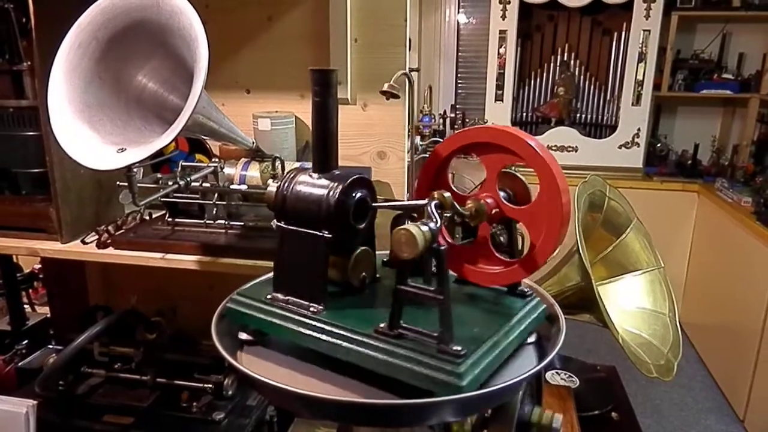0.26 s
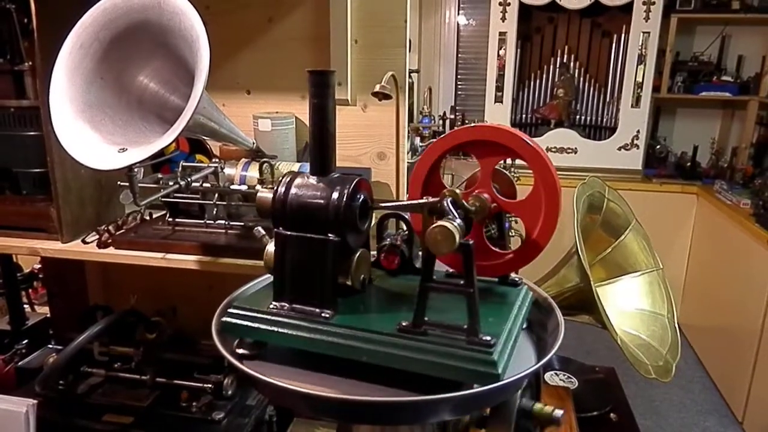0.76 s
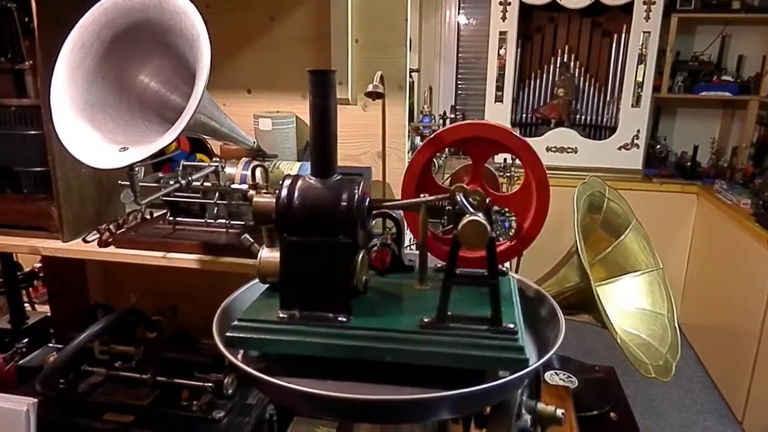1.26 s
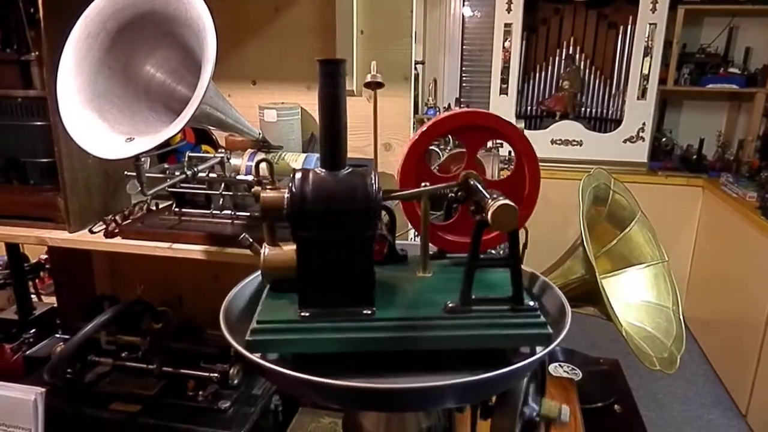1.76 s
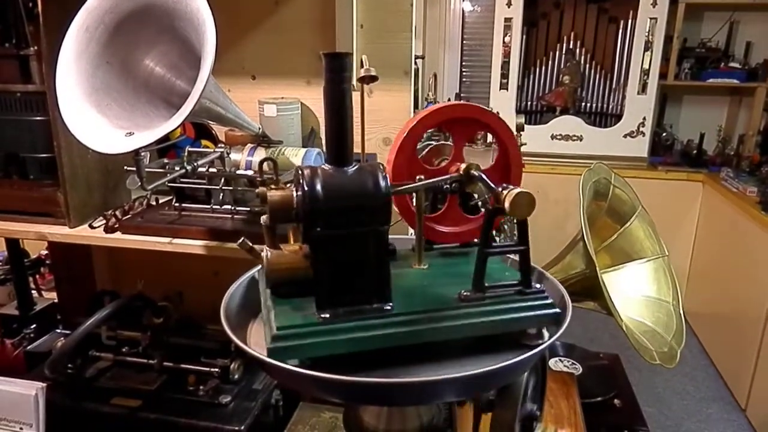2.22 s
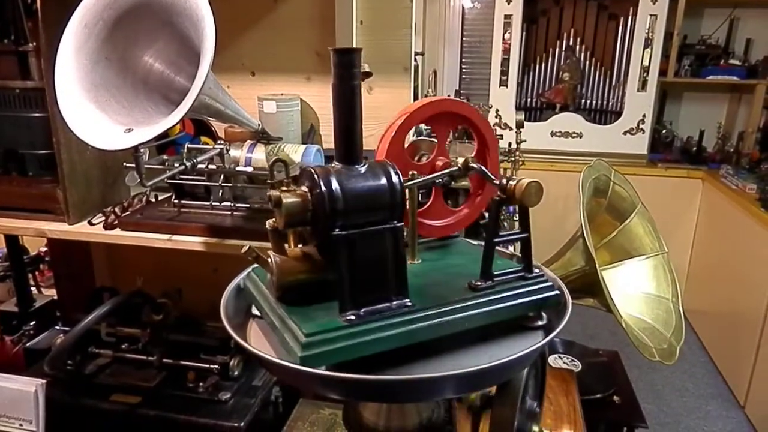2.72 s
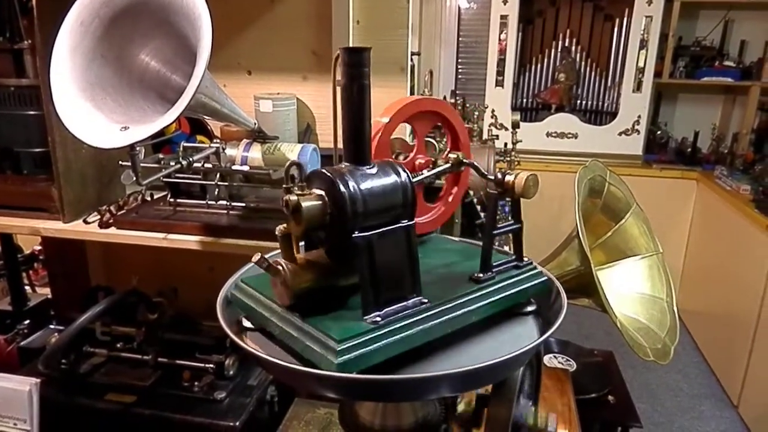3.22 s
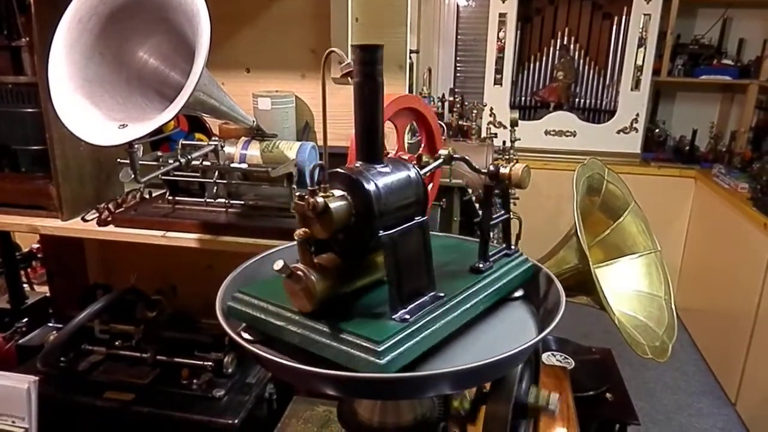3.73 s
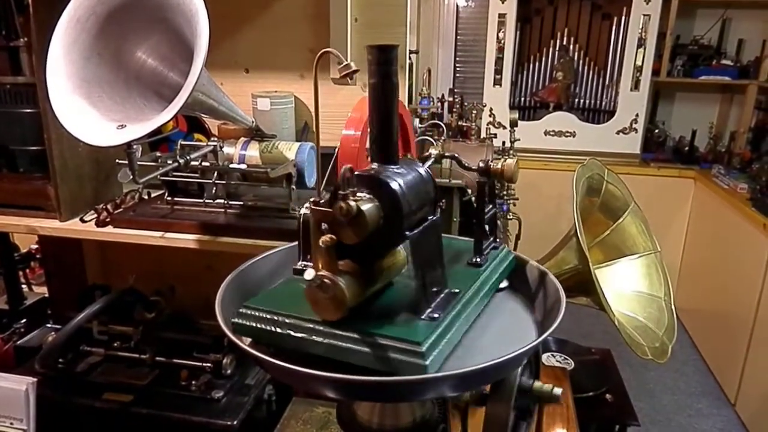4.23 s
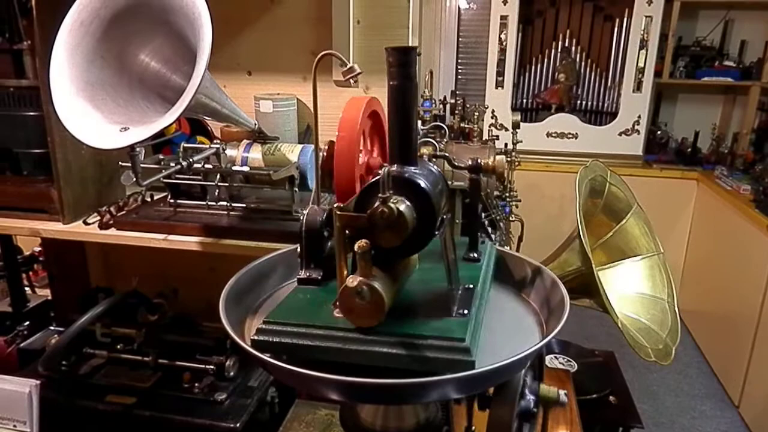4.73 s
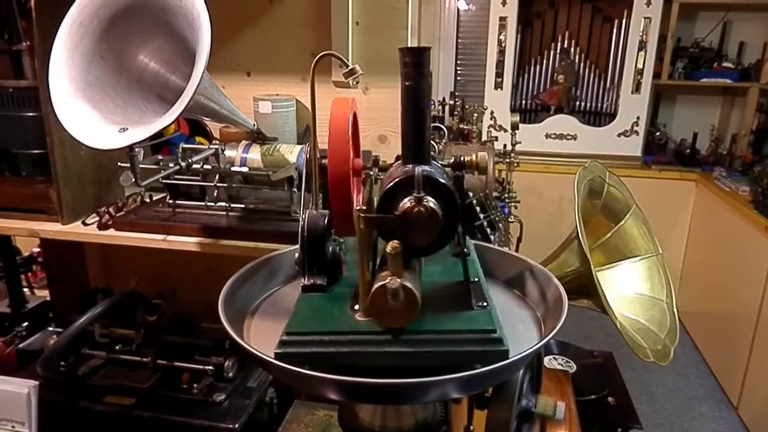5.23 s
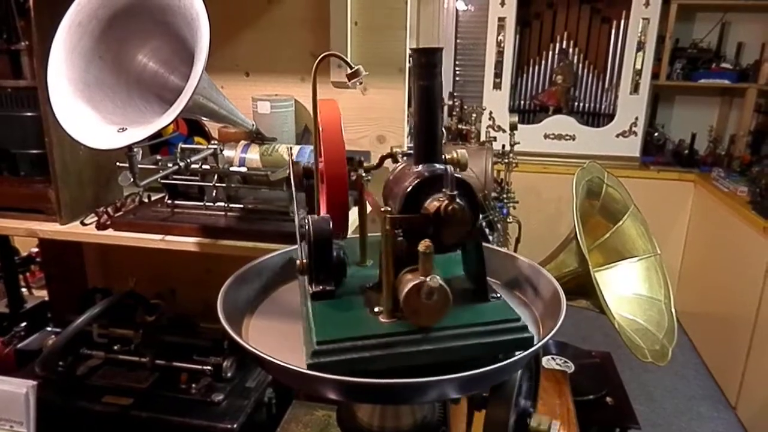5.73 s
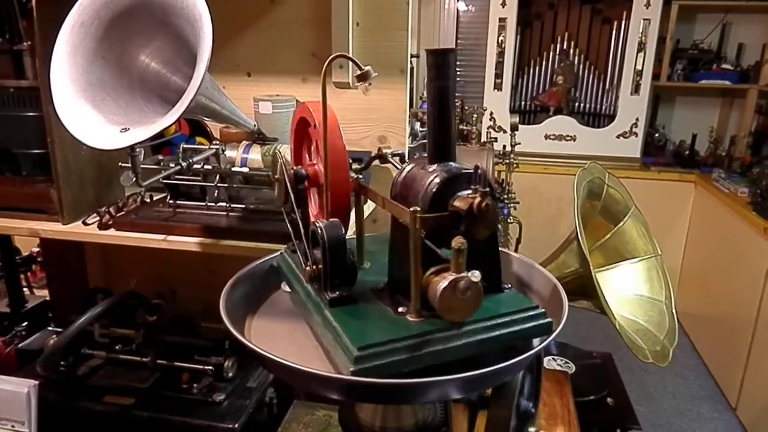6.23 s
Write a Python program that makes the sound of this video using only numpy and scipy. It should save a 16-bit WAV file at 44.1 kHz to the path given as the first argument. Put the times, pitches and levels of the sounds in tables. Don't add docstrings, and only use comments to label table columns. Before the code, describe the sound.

Rapid, even clacking from a miniature engine in a quiet small workshop, captured close in mono. Sharp valve clacks alternate with woody, hollow thumps, short cylinder rings, gritty clatter and fine link ticks. The rhythm holds throughout with slight unevenness from blow to blow; later the knocks grow heavier and a loose turntable piece adds dull taps and thin jingles. Faint hiss and low rumble lie beneath.

```python
import sys
import numpy as np
from scipy import signal
from scipy.fft import rfft, irfft
from scipy.io import wavfile
from scipy.ndimage import uniform_filter1d

SR = 44100
rng = np.random.default_rng(int(sys.argv[2]) if len(sys.argv) > 2 else 0)


def store_wav(level_fs):
    pcm = np.round(np.clip(np.atleast_2d(level_fs), -1, 1) * 32767)
    wavfile.write(sys.argv[1], SR, pcm.T.astype(np.int16))


def rack_gain(trim_db):
    fader = np.asarray(trim_db, float)
    return 10 ** (fader / 20)


N = 285327


def read(points, hz):
    f, value = np.transpose(points)
    return np.interp(np.log(hz + 1), np.log(f + 1), value)


def add(mix, s, sound):
    part = mix[round(s * SR):][:len(sound)]
    part += sound[:len(part)]


def strike(modes, db, luck, rise_s, detune=0.035, uneven_db=4.0):
    hz, mode_db, t60 = np.transpose(modes)[:, :, None]
    share, bend, phase = luck[:3 * len(modes)].reshape(3, -1, 1)
    t = np.arange(round(t60.max() * SR)) / SR
    decay = rack_gain(mode_db + uneven_db * share - 60 * t / t60)
    rings = decay * np.sin(2 * np.pi * hz * (1 + detune * bend) * t + 0.67 * phase)
    sound = rings.sum(0) * (1 - np.exp(-t / rise_s)) ** 2
    return rack_gain(db) * np.sqrt(2) * sound / abs(sound).max()


def swell(t, top_s, sharp):
    return (t / top_s * np.exp(1 - t / top_s)) ** sharp


def puff(noise, lo_hz, hi_hz, top_s, sharp):
    t = np.arange(len(noise)) / SR
    sos = signal.butter(3, (lo_hz, hi_hz), "bandpass", fs=SR, output="sos")
    band = signal.sosfilt(sos, noise)
    return band / band.std() * swell(t, top_s, sharp)


# (time [s], base level [dB], frame level [dB])
SEAT = [(.017, -45, -52.5), (.281, -53, -65), (.537, -53, -54), (.803, -68, -63), (1.067, -68, -69),
        (1.33, -43, -46), (1.597, -72, -47), (1.863, -44, -49), (2.129, -56, -44.5), (2.398, -40.5, -39.5),
        (2.664, -42, -46), (2.926, -49, -45), (3.195, -43.5, -39.5), (3.468, -47, -48),
        (3.732, -38.5, -41.5), (4.006, -53.5, -55.5), (4.272, -37.5, -42), (4.539, -47.5, -42),
        (4.818, -35, -42.5), (5.081, -39, -42), (5.354, -36, -39), (5.621, -37.5, -37), (5.887, -39.5, -36),
        (6.154, -35, -40.5), (6.42, -53, -44)]
# (time [s], base level [dB], frame level [dB])
PULL = [(.075, -39.5, -42), (.336, -38.5, -40), (.597, -38, -44), (.862, -39.5, -41.5), (1.123, -61, -43),
        (1.392, -36.5, -43), (1.656, -44, -43), (1.924, -38.5, -42.5), (2.193, -46, -40),
        (2.47, -36, -41.5), (2.725, -36.5, -41.5), (2.992, -44, -42.5), (3.276, -37.5, -42),
        (3.538, -41.5, -43.5), (3.79, -39, -45.5), (4.064, -41.5, -42), (4.331, -36, -42),
        (4.606, -39, -40), (4.87, -28.5, -40.5), (5.144, -35.5, -37), (5.412, -30.5, -40),
        (5.677, -30, -44), (5.939, -32, -44), (6.233, -33.5, -45)]
# (time [s], base level [dB], frame level [dB])
CENTRE = [(.156, -34.5, -49.5), (.416, -33.5, -64), (.679, -39.5, -47), (.945, -33.5, -63),
          (1.21, -35, -59), (1.479, -33.5, -47), (1.744, -38.5, -63), (2.007, -45.5, -55),
          (2.276, -35.5, -44.5), (2.545, -38, -48), (2.81, -34.5, -43), (3.081, -32.5, -41.5),
          (3.34, -35.5, -45), (3.612, -30, -45), (3.881, -36, -39), (4.15, -30, -42.5), (4.412, -45, -36),
          (4.687, -30.5, -41), (4.968, -36, -48), (5.228, -35, -40), (5.494, -32.5, -45), (5.758, -36, -45),
          (6.03, -33, -38.5), (6.3, -33, -40.5)]
# (time [s], base level [dB], frame level [dB], tray level [dB])
RETURN = [(.197, -45, -46, -37.5), (.463, -50, -63, -49), (.723, -48, -48.5, -41.5),
          (.987, -50, -43, -44.5), (1.266, -54, -44.5, -43), (1.542, -45, -48, -37),
          (1.812, -38.5, -46, -41.5), (2.048, -57, -48, -40), (2.343, -41.5, -48, -41.5),
          (2.608, -39, -47, -61), (2.878, -36.5, -46.5, -41.5), (3.14, -36, -47, -52),
          (3.412, -37, -51, -71), (3.665, -36, -45, -46), (3.942, -52.5, -73, -52), (4.201, -42, -44, -48),
          (4.478, -39, -44.5, -45), (4.749, -41, -49, -57), (5.018, -39, -45.5, -47),
          (5.275, -65, -48, -38), (5.541, -42, -43, -48), (5.807, -45, -45, -58), (6.075, -71, -52, -51),
          (6.36, -33, -41, -42)]
# (time [s], base level [dB], frame level [dB])
PULL_BOUNCE = [(.09, -58.5, -53), (.352, -42, -61), (.614, -42, -55), (.878, -42, -65), (1.14, -41, -59.5),
               (1.413, -43, -76), (1.676, -39, -66), (1.962, -40, -63), (2.207, -39.5, -59),
               (2.744, -40, -61), (4.367, -39, -59), (4.897, -34, -43), (5.157, -50, -45),
               (5.429, -31, -54), (5.474, -37, -61)]
# (time [s], base level [dB], frame level [dB], tray level [dB])
CRANK_BOUNCE = [(.447, -54, -50, -63), (.48, -56, -49, -42), (.742, -49, -67, -52), (1.237, -55, -52, -46),
                (1.762, -48, -47.5, -38.5), (2.027, -40.5, -45.5, -72), (2.069, -43, -50, -46),
                (3.365, -36, -45.5, -45.5), (3.679, -37, -52, -56.5), (3.904, -41, -61.5, -40),
                (4.223, -36, -59, -49), (4.433, -38, -41.5, -44.5), (4.702, -58, -43, -45),
                (5.249, -38, -47, -51), (5.296, -36.5, -63, -54), (5.567, -33, -62, -61),
                (5.826, -34, -44, -47), (6.094, -33.5, -41, -72)]
STEADY_TRAY_DB = dict(seat=-56.5, pull=-46.5, centre=-41, pull_bounce=-48)


def strokes():
    kinds = dict(seat=SEAT, pull=PULL, centre=CENTRE, back=RETURN,
                 pull_bounce=PULL_BOUNCE, crank_bounce=CRANK_BOUNCE)
    rows = []
    for kind, table in kinds.items():
        for s, base_db, frame_db, *tray in table:
            tray_db = tray[0] if tray else STEADY_TRAY_DB[kind]
            rows.append((s, base_db, tray_db, frame_db))
    return sorted(rows)


# (frequency [Hz], level [dB], t60 [s])
BASE_MODES = [(180.7, -2, 0.031), (198.6, 2, 0.062), (229.5, 2.5, 0.055), (253.2, -3, 0.058),
              (299.4, -10, 0.072)]
TRAY_MODES = [(118, 2.2, 0.07), (131.8, 8.9, 0.16)]
FRAME_MODES = [(457.3, 2.5, 0.085), (501.6, -1, 0.091), (530, -6.5, 0.074), (560.2, -8, 0.14),
               (736.2, -7, 0.087), (795, -15.5, 0.095)]


def knocks():
    out, rows = np.zeros(N), strokes()
    for (s, base_db, tray_db, frame_db), luck in zip(rows, rng.standard_normal((len(rows), 2500))):
        add(out, s, strike(BASE_MODES, base_db, luck, 0.0055, detune=0.017, uneven_db=4.0))
        add(out, s, strike(TRAY_MODES, tray_db, luck[40:], 0.002, detune=0.008, uneven_db=3.0))
        add(out, s, strike(FRAME_MODES, frame_db, luck[80:], 0.004, detune=0.005, uneven_db=2.2))
    return out


# (time [s], level [dB])
CLACKS = [(.0084, -51.5), (0.2723, -51), (0.535, -51), (0.799, -52), (1.0622, -52.5), (1.3284, -51),
          (1.593, -48), (1.857, -48.5), (2.126, -50.5), (2.395, -49), (2.6603, -49.5), (2.9272, -51),
          (3.1954, -51), (3.464, -51.5), (3.7316, -50), (3.9995, -50.5), (4.2685, -49), (4.5391, -49),
          (4.8084, -52.5), (5.0773, -49.5), (5.3456, -52.5), (5.6148, -51.5), (5.8842, -49.5), (6.151, -49),
          (6.4191, -49)]
# (time [s], level [dB])
TOUCHES = [(0.522, -61), (0.788, -75), (1.8447, -61), (2.1096, -84), (2.3765, -61), (2.91, -63),
           (3.989, -68), (4.253, -65), (4.797, -62.5), (5.5977, -62), (6.144, -55)]
# (frequency [Hz], level [dB], t60 [s])
VALVE_MODES = [(1210, 8.5, 0.035), (2290, -5, 0.054), (3350, 0, 0.011), (3937, -6.5, 0.021),
               (4670, 9, 0.019), (4790, -7.5, 0.041), (5005, 6.5, 0.02), (6030, -5, 0.031),
               (7250, -7.5, 0.037), (9460, 7.5, 0.0036), (10290, 0, 0.041), (10350, 1.5, 0.028)]
# (frequency [Hz], level [dB], time to the loudest point [s])
SQUEAL = [(7730, -4, 0.027), (5590, -8, 0.027)]


def valve():
    out, t = np.zeros(N), np.arange(3500) / SR
    shell = [(2130, 0, 0.19)]
    shell_fade_db_per_s = -0.6
    squeal_db = -18
    band = signal.butter(4, (3000, 10800), "bandpass", fs=SR, output="sos")
    for (s, db), luck in zip(CLACKS, rng.standard_normal((len(CLACKS), len(t)))):
        add(out, s, strike(VALVE_MODES, db - 2.5, luck, 0.00065, detune=0.0024))
        shell_db = db - 18 + shell_fade_db_per_s * s
        add(out, s + 0.006, strike(shell, shell_db, luck[80:], 0.0022, detune=0.0032, uneven_db=0))
        add(out, s, rack_gain(db - 11) * puff(luck, 8400, 9600, 0.0009, 1.3))
        add(out, s + 0.0036, strike(VALVE_MODES[:4], db - 3.0, luck[40:], 0.00049, detune=0.0031))
        add(out, s, rack_gain(db - 7.5 - 60 * t / 0.065) * signal.sosfilt(band, luck))
        add(out, max(s - 0.03, 0), rack_gain(db - 29.5) * puff(luck[::-1], 2000, 10600, 0.055, 1.1))
        for hz, line_db, top_s in SQUEAL:
            tone = np.sin(2 * np.pi * hz * t + 3 * luck[0])
            add(out, s, rack_gain(db + squeal_db + line_db) * swell(t, top_s, 4.1) * tone)
    for (s, db), luck in zip(TOUCHES, rng.standard_normal((len(TOUCHES), 40))):
        add(out, s, strike(VALVE_MODES[2:], db - 8.5, luck, 0.000093, detune=0.0072))
    return out


# (time [s], bright tick level [dB], rod level [dB])
PIN_TICKS = [(0.1773, -50, -70), (0.437, -55.5, -68), (0.7034, -53, -86), (0.967, -51.5, -70.5),
             (1.231, -53.5, -72), (1.497, -57, -87), (1.7623, -54.5, -71.5), (2.0292, -55, -70.5),
             (2.2988, -62, -66.5), (2.561, -56, -78), (2.829, -54.5, -76.5), (3.096, -51.5, -87),
             (3.3629, -54.5, -72), (3.63, -54, -116), (3.903, -51, -68), (4.173, -49.5, -99.5),
             (4.4394, -59, -67.5), (4.711, -50, -68.5), (4.975, -51, -68.5), (5.248, -52.5, -68.5),
             (5.513, -58, -67.5), (5.7865, -58.5, -82), (6.0538, -57, -83), (6.323, -54, -66.5)]
# (time [s], bright tick level [dB], pin level [dB])
ROD_TICKS = [(.0715, -54, -94), (.3316, -60, -73), (.596, -53.5, -99), (.6779, -81, -90), (.859, -63, -88),
             (1.1235, -53, -83), (1.6536, -58, -77), (1.918, -73, -77), (2.1868, -59, -69),
             (2.2716, -54.5, -78), (2.7106, -58, -78), (2.8001, -88, -99), (2.9874, -64, -80),
             (3.5232, -48.5, -80), (4.137, -73, -88), (4.3294, -58, -70), (4.8687, -52, -80),
             (5.9918, -67, -82)]


def ticks():
    pin_db, rod_db = -67, -70.5
    at_pin = [(s, db, pin_db, other_db) for s, db, other_db in PIN_TICKS]
    at_rod = [(s, db, other_db, rod_db) for s, db, other_db in ROD_TICKS]
    return sorted(at_pin + at_rod)


# (frequency [Hz], level [dB], t60 [s])
LINK_MODES = [(10360, -4, 0.0053), (11920, -7, 0.0084), (13320, -1.5, 0.0049), (14300, -3.5, 0.002)]
PIN_MODES = [(2713, -15, 0.043), (2660, -6, 0.006), (3130, -8, 0.0043)]
ROD_MODES = [(4770, -5.5, 0.057), (5760, 1, 0.013), (7060, -5, 0.032), (7280, 0.5, 0.014), (8760, 4, 0.016)]


def links():
    out, rows = np.zeros(N), ticks()
    for (s, db, pin_db, rod_db), luck in zip(rows, rng.standard_normal((len(rows), 4000))):
        add(out, s, strike(LINK_MODES, db - 5.0, luck, 0.0001))
        add(out, s, rack_gain(db - 17) * puff(luck, 10500, 22000, 0.001, 3.0))
        add(out, s, strike(PIN_MODES, pin_db + 4, luck[20:], 0.00018, detune=0.0099, uneven_db=2))
        add(out, s, strike(ROD_MODES, rod_db, luck[40:], 0.00028, detune=0.0053))
        add(out, s - 0.025, rack_gain(pin_db - 13.0) * puff(luck, 1900, 3300, 0.02, 1.1))
        add(out, s - 0.004, rack_gain(rod_db - 13.5) * puff(luck, 4600, 12000, 0.012, 0.24))
    return out


# (time [s], clatter level [dB], ring over it [dB], grit over it [dB])
CLATTER = [(0.0169, -48.5, 3.5, -13), (0.0742, -52.5, -4, -23), (0.1535, -63.5, -1, -8),
           (0.1994, -59, 10.5, -17), (0.2783, -49.5, 4, -14), (0.3356, -50, -8, -15), (0.4179, -57, -1, -9),
           (0.4614, -62, 12, -19), (0.5412, -50, 3, -19), (0.5985, -55.5, 2, -34), (0.6794, -68.5, 4, -2),
           (0.7253, -64, 11, -27), (0.8051, -51.5, 2, -18), (0.8609, -52.5, -4, -22), (0.9448, -64, 8, -8),
           (0.9892, -61.5, 7.5, -26), (1.0695, -48.5, 2, -27), (1.1248, -58.5, -1.5, -11.5),
           (1.2096, -56.5, 0, -8), (1.3059, -56, -2, -17.5), (1.3339, -49, 2, -26), (1.3912, -51, 1.5, -10),
           (1.4755, -53.5, -0.5, -14), (1.5993, -50, 5, -17), (1.6566, -51.5, -1.5, -9),
           (1.7414, -63, 7.5, -4.5), (1.7843, -55.5, 3, -27), (1.8657, -49, 2.5, -12),
           (1.923, -50.5, -0.5, -14), (2.0083, -57.5, -6, -10.5), (2.0512, -59, 6.5, -28),
           (2.1321, -47.5, 1.5, -18), (2.1899, -50.5, -2, -10.5), (2.2742, -54, -2, -20.5),
           (2.3391, -58.5, 4, -23), (2.3989, -49, 1, -15), (2.4578, -50.5, 3, -14), (2.5411, -54, 1, -7.5),
           (2.6035, -60, 9, -26), (2.6653, -45.5, -1.5, -22), (2.7252, -47, -6, -12.5),
           (2.808, -55, -3, -19), (2.8519, -54.5, 3, -13), (2.9327, -50.5, 3.5, -21.5),
           (2.9911, -46, -8.5, -23), (3.0739, -54.5, 1, -21), (3.1383, -58, 10.5, -9),
           (3.2001, -50, 3.5, -15), (3.26, -54.5, 7.5, -15)]
# (time [s], clatter level [dB], ring over it [dB], grit over it [dB])
CLATTER_LATER = [(3.3043, -71, 9, -11), (3.3422, -55, 8, -13), (3.4116, -53, 1.5, -17),
                 (3.4671, -50, 4, -26), (3.5238, -50.5, 3, -18), (3.607, -63.5, 7, -18.5),
                 (3.6541, -50.5, -0.5, -12), (3.7363, -48, 3, -10), (3.7977, -51.5, -7, -16.5),
                 (3.877, -56.5, 2, -10.5), (3.9429, -55, 1.5, -33), (4.0052, -49, 3, -11.5),
                 (4.0622, -51, -6, -18.5), (4.1431, -59, 6, -14), (4.1918, -52.5, 1, -7),
                 (4.2771, -49.5, 5, -8.5), (4.3333, -51, -1, -13.5), (4.4163, -47.5, 1.5, -26),
                 (4.4628, -54.5, -5, -20.5), (4.544, -48.5, 6, -15), (4.6047, -47.5, -8, -14),
                 (4.6766, -48.5, -1.5, -21.5), (4.8104, -48.5, 2, -14), (4.8708, -49, -3, -15),
                 (4.9434, -64.5, 6, -7.5), (5.0126, -53.5, -7, -6.5), (5.081, -50, 6.5, -16),
                 (5.14, -50, -5, -15), (5.2236, -51, -4, -20.5), (5.2797, -55.5, 0, -11),
                 (5.3518, -46.5, -3.5, -16.5), (5.4065, -42.5, -7, -17.5), (5.4924, -55.5, 4, -14),
                 (5.5472, -49.5, 4.5, -12), (5.6211, -47, 3.5, -40), (5.6764, -44, -10, -17),
                 (5.8106, -52, 2.5, -21.5), (5.8889, -47.5, 0.5, -13), (5.9463, -46.5, -4, -17.5),
                 (6.0311, -48, -6, -20), (6.081, -49.5, 6, -13), (6.1573, -49, 3.5, -16),
                 (6.2125, -47.5, -8, -14.5), (6.299, -56, 1, -14.5), (6.3605, -52.5, 1.5, -13.5),
                 (6.4257, -48.5, 0, -13)]
# (frequency [Hz], level [dB],
# t60 [s])
CYLINDER_MODES = [(929.6, 0.5, 0.065), (956, -8, 0.047), (737, -9.5, 0.059)]


def clatter():
    out, rows = np.zeros(N), list(CLATTER) + list(CLATTER_LATER)
    for (s, db, ring_db, grit_db), luck in zip(rows, rng.standard_normal((len(rows), 2600))):
        add(out, s, strike(CYLINDER_MODES, db + ring_db - 2.5, luck, 0.0014, detune=0.0056, uneven_db=1.5))
        add(out, s - 0.001, rack_gain(db - 9.0) * puff(luck, 786, 1544, 0.0051, 0.67))
        add(out, s - 0.001, rack_gain(db + grit_db - 6.5) * puff(luck[::-1], 1700, 3400, 0.0051, 1.0))
    return out


# (time [s], jingle level [dB], dull tap level [dB])
RATTLES = [(2.2613, -65.5, -55), (2.2731, -57, -51), (2.475, -59.5, -44.5), (2.6095, -66.5, -46),
           (2.8085, -64.5, -47.5), (3.1433, -55.5, -44.5), (3.2755, -61, -46), (3.4087, -73.5, -42),
           (3.5412, -67, -37.5), (3.6755, -74, -42), (3.9418, -65, -49), (4.0757, -61.5, -49),
           (4.2093, -68, -48.5), (4.3424, -68, -47), (4.4134, -59, -43), (4.4757, -76, -50),
           (4.7418, -67.5, -45), (5.011, -65, -45), (5.2774, -63.5, -45.5), (5.5443, -59.5, -36.5),
           (5.6779, -61, -42), (5.8117, -61.5, -41.5), (5.9443, -60.5, -39.5), (6.0781, -62, -37),
           (6.213, -61, -47), (6.3455, -71.5, -45), (6.411, -57.5, -47)]
# (frequency [Hz], level [dB], t60 [s])
JINGLE_MODES = [(2400, 6, 0.012), (4830, 0.5, 0.014), (6440, -1, 0.0085), (7440, 3.5, 0.015),
                (8700, 0, 0.0068)]
TAP_MODES = [(570, 1, 0.013), (760, -3.5, 0.013)]


def rattle():
    out = np.zeros(N)
    for (s, db, tap_db), luck in zip(RATTLES, rng.standard_normal((len(RATTLES), 1500))):
        add(out, s, strike(JINGLE_MODES, db - 2.0, luck, 0.00075, detune=0.0083, uneven_db=1.0))
        add(out, s, strike(TAP_MODES, tap_db + 2.0, 0.35 * luck[40:], 0.00033, detune=0.045, uneven_db=7.0))
        add(out, s, rack_gain(db - 14.0) * puff(luck, 3400, 12000, 0.0042, 0.97))
    return out


# (frequency [Hz], t60 [s])
ROOM_DECAY = [(150, 0.76), (1000, 0.39), (5000, 0.23), (12000, 0.12)]


def room():
    taps = np.zeros(SR // 2)
    at = np.arange(300, len(taps) - 20, 20)
    taps[at + rng.integers(0, 20, len(at))] = rng.choice([-1., 1.], len(at))
    hz, t, z = signal.stft(taps, SR, nperseg=256)
    decay = rack_gain(-60 * t / read(ROOM_DECAY, hz)[:, None])
    tail = signal.istft(z * decay, SR, nperseg=256)[1]
    return tail / np.linalg.norm(tail)


# (frequency [Hz], density [dB per Hz])
FLOOR_SPECTRUM = [(25, -14), (60, -4.5), (130, -7.5), (162, -6.5), (215, -2.5), (370, -11.5), (463, -11),
                  (640, -20.5), (936, -27.5), (1890, -48.5), (3800, -47), (13000, -47.5), (14800, -47.5),
                  (15800, -41.5)]


def floor():
    floor_db, whine_db, whine_hz = -50, -92, 14955
    hz = np.fft.rfftfreq(N, 1 / SR)
    noise = irfft(rfft(rng.standard_normal(N)) * rack_gain(read(FLOOR_SPECTRUM, hz)), N)
    whine = rack_gain(whine_db) * np.sqrt(2) * np.sin(2 * np.pi * whine_hz * np.arange(N) / SR)
    return rack_gain(floor_db) * noise / noise.std() + whine


# (frequency [Hz], level over the quiet level [dB])
GATE = [(2200, -10), (3800, 2), (12000, 2), (14600, -3)]
OPENINGS = [.337, .894, 1.126, 1.219, 3.402, 4.156, 4.68, 4.87, 5.22, 5.677, 6.002]


def gate(x):
    window = np.sqrt(signal.windows.hann(2048, sym=False))
    hz, t, z = signal.stft(x, SR, window, nperseg=2048, noverlap=1024)
    power = abs(z) ** 2
    band = uniform_filter1d(power, size=25, axis=1)
    quiet = np.median(band, axis=2, keepdims=True)
    limit = quiet * rack_gain(2 * read(GATE, hz))[:, None]
    lone = uniform_filter1d(power, size=3, axis=1) > 1.55 * limit
    opening = (abs(t[:, None] - np.array(OPENINGS)) < 0.016).any(1)
    usual_gain = np.maximum((band > limit) | lone, 0.7 * opening)
    gain = np.where(opening & (hz[:, None] > 14600), 0.4, usual_gain)
    return signal.istft(z * gain, SR, window, nperseg=2048, noverlap=1024)[1][:, :N]


def scene():
    room_db = -11
    engine = knocks() + valve() + links() + clatter() + rattle()
    echoes = signal.fftconvolve(engine, room())[:N]
    return (engine + rack_gain(room_db) * echoes + floor())[None]


def low_pass(x):
    return signal.sosfilt(signal.butter(12, 16710, fs=SR, output="sos"), x)


def record(dry):
    lowpass = signal.firwin(511, 15850, window=("kaiser", 9), fs=SR)
    limited = signal.oaconvolve(dry, lowpass[None], "same")
    return low_pass(gate(limited))


dry = scene()
out = record(dry)
store_wav(out)
```